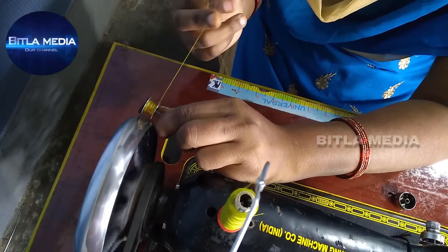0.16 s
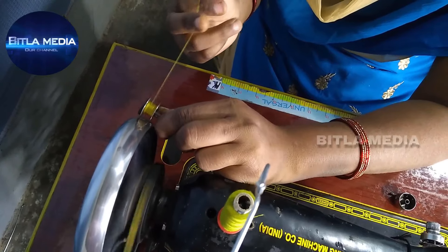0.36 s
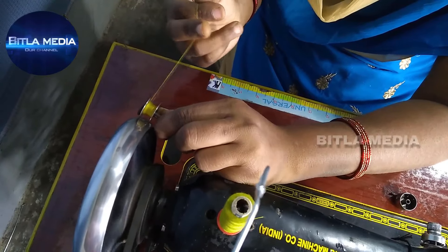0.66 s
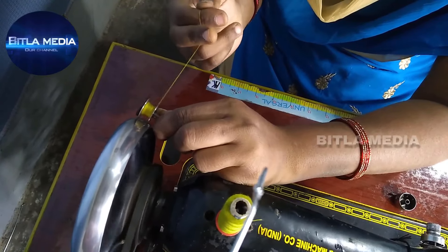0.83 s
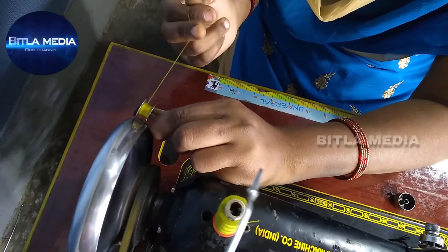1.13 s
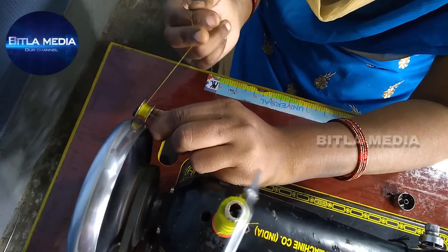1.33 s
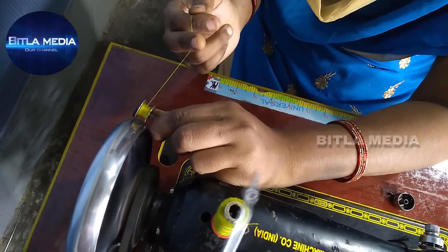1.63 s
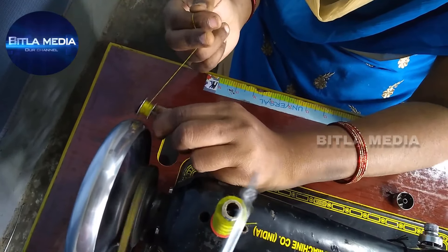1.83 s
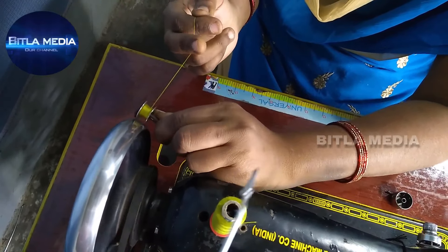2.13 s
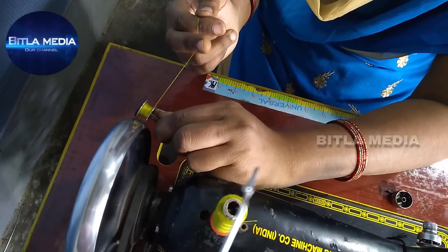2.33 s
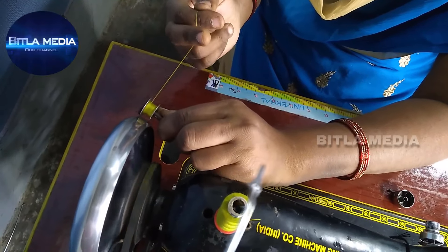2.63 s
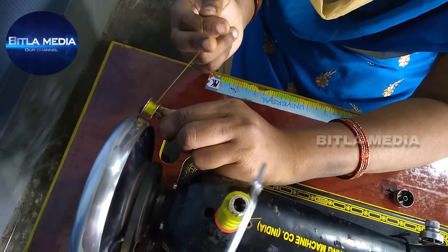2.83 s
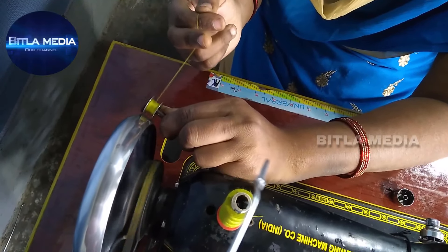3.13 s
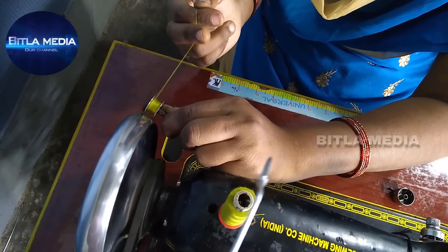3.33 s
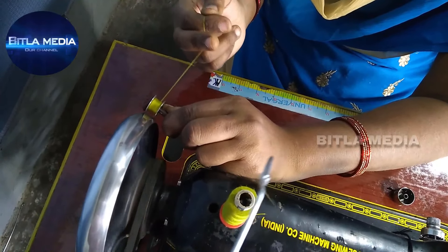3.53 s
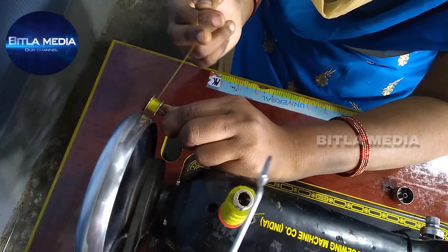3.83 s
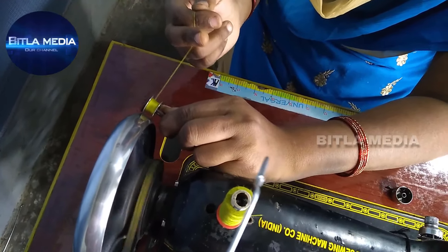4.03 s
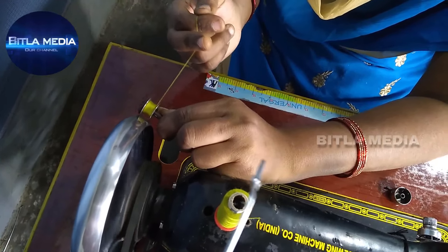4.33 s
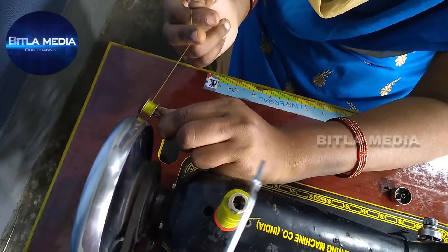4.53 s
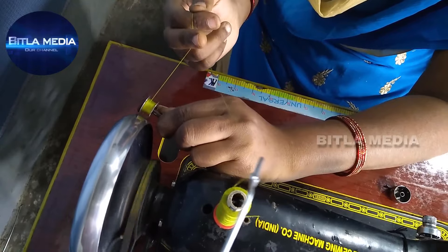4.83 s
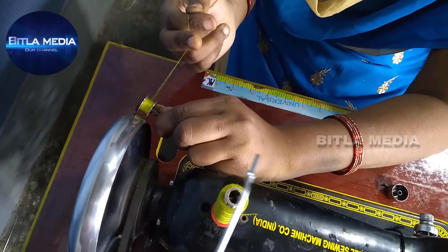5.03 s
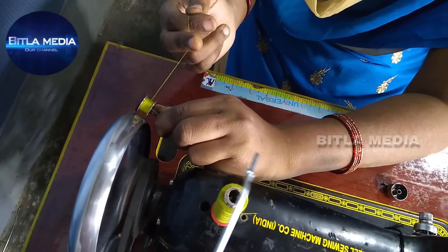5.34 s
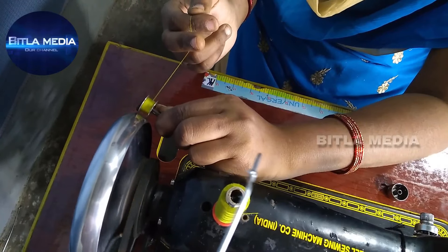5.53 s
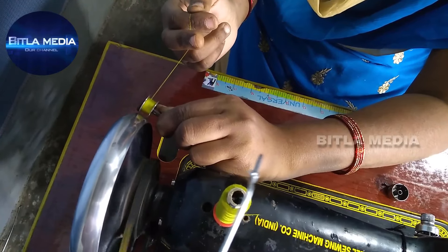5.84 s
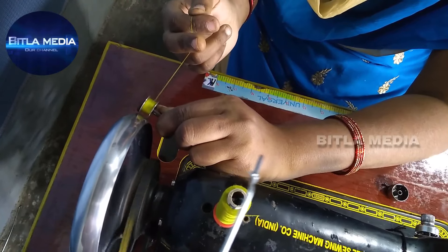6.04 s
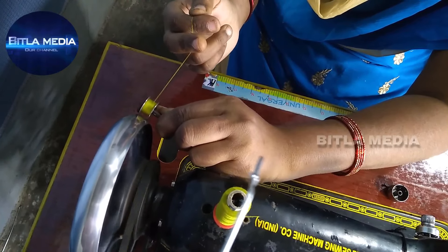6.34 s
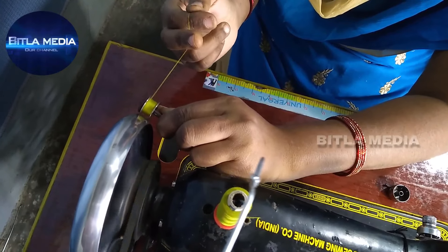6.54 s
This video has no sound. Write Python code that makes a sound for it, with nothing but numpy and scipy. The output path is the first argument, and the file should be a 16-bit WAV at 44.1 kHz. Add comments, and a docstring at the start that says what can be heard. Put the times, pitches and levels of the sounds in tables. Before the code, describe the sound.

A treadle sewing machine winds a bobbin with a bright metallic hiss and high singing, surging and sagging between pushes, with light shuttle clacks beneath.

```python
"""A bright metallic hiss and singing close by on the right: a treadle sewing machine winds a bobbin.
The steel bobbin chafes on its spindle, which feeds its modes. The shuttle clacks twice a stitch as noise bursts,
the iron frame and wooden table rumble as driven resonances, the treadle hums a low gliding note.
The pace sags to near stops between pushes."""
import sys
import numpy as np
from scipy import signal
from scipy.fft import rfft, irfft, next_fast_len
from scipy.io import wavfile
from scipy.ndimage import map_coordinates

SR = 44100
rng = np.random.default_rng(int(sys.argv[2]) if len(sys.argv) > 2 else 0)


def dump(signal):
    """Clip the signal to [-1, 1] and save it as 16-bit WAV at the path in sys.argv[1]."""
    limited = np.clip(np.atleast_2d(signal).T, -1, 1)
    pcm = np.round(limited * 32767).astype(np.int16)
    wavfile.write(sys.argv[1], SR, pcm)


def gain_from_db(level_db):
    """Convert decibel levels to linear amplitude factors (20 dB per decade)."""
    decades = np.asarray(level_db, float) / 20
    return 10 ** decades


N = 294588

# Low modes of the steel bobbin. Each row: frequency in Hz, width in Hz, relative right level in dB,
# left minus right in dB, left-right likeness (0-1).
BOBBIN_LOW_MODES = [(788, 28, -41, 0, .98), (1490, 40, -38, -8, .4), (3585, 36, -21, -16, .8),
                    (3968, 36, -25, -2, .75), (4460, 90, -34, 0, .4), (5250, 55, -14, -5, .6),
                    (5295, 32, -12, -3, .9), (6065, 60, -4, -11, .85), (6120, 45, 0, -10, .9),
                    (6183, 30, -1, -9, .92), (6270, 200, -17, -9, .6)]
# Modes of iron frame and wooden table. Each row: frequency in Hz, width in Hz, relative right level in dB,
# left minus right in dB, left-right likeness (0-1).
FRAME_TABLE_MODES = [(283, 5.3, 2, 3, 0.91), (358, 16.2, 5.5, -0.5, 0.98), (427, 40, -8, -16, 0.28),
                     (523, 34.5, 2.5, -7.5, 0.65), (617, 43, -7, -5, 1), (787, 51, -8.5, 1.5, 0.96),
                     (1466, 65, -15, -34, 0.37), (1642, 93, -8.5, -7, 0.57), (2220, 380, -12.5, -8.5, 0.1),
                     (2930, 150, -10.5, 1.5, 0.58), (3113, 100, -9, -17, 0.17)]
LEFT_LAG_SAMPLES = 9


def rms_one(x):
    """Scales to unit rms."""
    return x / np.sqrt(np.mean(x ** 2) + 1e-20)


def level_one(stereo):
    """Scales so that the mean of both ears has unit rms."""
    return stereo / np.sqrt(np.mean(stereo.mean(axis=0) ** 2))


def drift(rate_hz):
    """Slow random wander of unit rms: noise through a two-pole low-pass near rate_hz."""
    step = 20  # samples
    pole = np.exp(-2 * np.pi * rate_hz * step / SR)
    noise = rng.standard_normal(N // step + 2002)
    slow = signal.lfilter([1], [1, -2 * pole, pole * pole], noise)[2000:]  # settled part
    return np.interp(np.arange(N) / step, np.arange(len(slow)), rms_one(slow))


def grains(spread_db):
    """Two unrelated streams of tiny contacts of uneven size."""
    sizes = gain_from_db(spread_db * np.minimum(rng.exponential(1, (2, N)), 4))
    return rms_one(sizes * rng.standard_normal((2, N)))


def to_ears(pair, likeness, lag_samples):
    """The left microphone hears the source later, mixed with a path of its own."""
    own, source = pair
    alike = np.clip(likeness, 0, 1)
    left = alike * np.roll(source, lag_samples) + np.sqrt(1 - alike ** 2) * own
    return np.array([left, source])


def through_modes(pair, modes, flicker_db=0):
    """A force drives parallel resonances; as the contact wanders each one is fed more or less."""
    airborne_hz = 2000  # lower modes shake the whole table and reach both ears at once
    out = np.zeros((2, N))
    for k, (hz, width_hz, right_db, pan_db, likeness) in enumerate(modes):
        pole, angle = np.exp(-np.pi * width_hz / SR), 2 * np.pi * hz / SR
        zeros = [(1 - pole * pole) / 2, 0, (pole * pole - 1) / 2]
        poles = [1, -2 * pole * np.cos(angle), pole * pole]
        rung = signal.lfilter(zeros, poles, pair + 1e-18)
        ears_db = np.array([[right_db + pan_db], [right_db]])
        gain = gain_from_db(ears_db + flicker_db * drift(9.7))
        lag_samples = LEFT_LAG_SAMPLES * (hz > airborne_hz)
        out += (-1) ** k * gain * to_ears(rung, likeness, lag_samples)
    return out


def coloured(pair, spectrum, likeness, alike_below_hz):
    """Gives each ear its spectrum; long waves reach both ears alike."""
    size = next_fast_len(N)
    hz, right_db, left_db = np.transpose(spectrum)
    bins_hz = np.fft.rfftfreq(size, 1 / SR) + 1
    gain = gain_from_db(np.array([np.interp(np.log(bins_hz), np.log(hz), db) for db in (left_db, right_db)]))
    left, right = rfft(to_ears(pair, likeness, LEFT_LAG_SAMPLES), size)
    share = 1 / (1 + (bins_hz / alike_below_hz) ** 4)
    left = np.sqrt(share) * right + np.sqrt(1 - share) * left
    return level_one(irfft(np.array([left, right]) * gain, size)[:, :N])


def blows(seconds, peaks_db, rise_s, hold_s, t60_s):
    """Envelope of blows: a quick rise, a short hold, then an exponential fall."""
    clicks = np.full(N, 1e-18)
    at = np.minimum(np.round(seconds * SR).astype(int), N - 1)
    clicks[at] = gain_from_db(peaks_db)
    t = np.arange(SR // 5) / SR
    rise = 1 - np.exp(-t / rise_s)
    shape = rise * gain_from_db(-60 * np.maximum(t - hold_s, 0) / t60_s)
    return signal.fftconvolve(clicks, shape / shape.max())[:N]


def in_time(rows):
    """Joins (s, value) rows by straight lines, one value a sample."""
    return np.interp(np.arange(N) / SR, *np.transpose(rows))


def levelling_db(pace, half_pace, power):
    """Gain (negative dB) of a sound that grows as a power of pace and levels off above half_pace."""
    return -20 * np.log10(1 + (half_pace / pace) ** power)


def bobbin(low_db, high_db, hiss_db):
    """One uneven chafing contact makes the hiss and feeds every mode; lone ticks ring the high ones."""
    # High modes of the bobbin. Each row: frequency in Hz, width in Hz, relative right level in dB,
    # left minus right in dB, left-right likeness (0-1).
    high_modes = [(8285, 110, -11, -1, .4), (8378, 40, -7, -6, .4), (8710, 60, -21, 1, .3),
                  (9610, 110, -15, -7, .5), (10530, 55, -3, -13, .7), (10590, 50, -3, -17, .6),
                  (10640, 40, 0, -21, .6), (10682, 28, -3, -19, .6), (11900, 45, -7, -20, .7),
                  (12690, 190, -14, -10, .4), (13270, 120, -24, 1, .3), (14600, 200, -17, -1, .4)]
    # Chafing spectrum. Each row: frequency in Hz, relative right and left density in dB per Hz.
    hiss_spectrum = [(990, -47, -47), (3100, -29, -26.5), (4300, -62.5, -23), (4880, -6, -6),
                     (5560, 5, -17), (7220, -2, -1.5), (8760, 5, -7), (9060, -1, -40), (11400, 6.5, 1.5),
                     (11900, -3.5, -22), (13300, 6.5, 0), (13600, -11, -6), (14500, -31, -28),
                     (15500, -12, -31)]
    # Ticks of the resting bobbin on its spindle. Each row: start in seconds, driving level in dB.
    tick_rows = [(0.3915, -33), (4.6857, -38), (4.7052, -47), (4.793, -35), (4.853, -25), (4.8822, -43),
                 (4.9362, -29)]
    pressure_db = 0.27 * drift(14.0) + 0.84 * drift(61.0)
    contact = grains(spread_db=1.5) * gain_from_db(pressure_db)
    low = gain_from_db(low_db) * level_one(through_modes(contact, BOBBIN_LOW_MODES, flicker_db=3.0))
    high = gain_from_db(high_db) * level_one(through_modes(contact, high_modes, flicker_db=2.5))
    chafing = gain_from_db(hiss_db) * coloured(contact, hiss_spectrum, likeness=0.1, alike_below_hz=210)
    tick_envelope = blows(*np.transpose(tick_rows), rise_s=0.0004, hold_s=0.001, t60_s=0.02)
    ticks = tick_envelope * grains(spread_db=1.0)
    tick_ring = gain_from_db(20) * through_modes(ticks, high_modes)
    tick_edge = gain_from_db(-12) * signal.lfilter([1, -1], [1], ticks)
    return wobbled(low + high, depth_samples=0.72, rate_hz=19.7) + chafing + tick_ring + tick_edge


def wobbled(stereo, depth_samples, rate_hz):
    """The bobbin sits loose: its path to the microphones shakes and every pitch flutters."""
    at = np.arange(N) + depth_samples * drift(rate_hz)
    return np.array([map_coordinates(ear, [at], order=3, mode="nearest") for ear in stereo])


def shuttle(shake_db):
    """Out and back: a thinner second clack a third of a turn after the first, which alone knocks the frame."""
    # Stitches that stand out. Each row: start of first clack in seconds, its driving level in dB.
    stitches = [(0.565, -40), (0.6785, -27.5), (0.765, -28.5), (0.852, -29.5), (0.948, -38), (1.029, -29.5),
                (1.1265, -26.5), (1.207, -27), (1.278, -21), (1.346, -25.5), (1.412, -23.5), (1.477, -24.5),
                (1.546, -25), (1.6143, -25.5), (1.68, -24.5), (1.7435, -25), (1.813, -25), (1.8877, -26.5),
                (1.97, -29), (2.061, -33), (2.1655, -43), (2.289, -34.5), (2.4164, -43), (2.526, -32),
                (2.6385, -34), (3.2494, -45), (3.347, -28), (3.449, -30), (3.84, -34), (3.956, -32),
                (4.0534, -34), (4.133, -28), (4.2215, -31), (5.6094, -33), (5.7124, -27), (5.7944, -23.5),
                (5.8755, -27), (5.967, -30), (6.3914, -34.5), (6.466, -29), (6.557, -26.5), (6.6403, -26.5)]
    # Clack spectrum. Each row: frequency in Hz, relative right and left density in dB per Hz.
    clack_spectrum = [(990, -30.5, -47), (3360, -11.5, -30), (3550, -5.5, -9), (4080, -10.5, -22),
                      (4680, -2, -2), (5940, 1, -5.5), (7940, -2, -4.5), (11400, -2, -22), (14000, -12, -8),
                      (15800, -17, -20)]
    second_turn, longest_stitch_s = 0.34, 0.24
    s, peak_db = np.transpose(stitches)
    chance = rng.standard_normal((len(s), 2))
    shake_at_db = shake_db[(s * SR).astype(int)]
    knock_db = -50.5 + 1.82 * shake_at_db + 0.5 * chance[:, 0]
    second_db = -4.5 + 0.6 * shake_at_db + 1.5 * chance[:, 1]  # against the first clack
    stitch_s = np.minimum(np.diff(s, append=s[-1] + 0.058), longest_stitch_s)
    second_s = s + second_turn * stitch_s

    rattle = coloured(grains(spread_db=3.0), clack_spectrum, likeness=0.043, alike_below_hz=470)
    thin = signal.sosfilt(signal.butter(4, 4300, "high", fs=SR, output="sos"), rattle)
    first = blows(s, peak_db, rise_s=0.00045, hold_s=0.0045, t60_s=0.058) * rattle
    second = blows(second_s, peak_db + second_db, rise_s=0.0004, hold_s=0.006, t60_s=0.06) * thin

    push = blows(s, knock_db, rise_s=0.0021, hold_s=0.0026, t60_s=0.18) * grains(spread_db=4.0)
    push = signal.sosfilt(signal.butter(2, 2100, fs=SR, output="sos"), push)  # heavy frame, blunt blow
    arm = [mode for mode in FRAME_TABLE_MODES if 1000 < mode[0] < 2000]
    table = [mode for mode in FRAME_TABLE_MODES if mode[0] < 1000]
    knock = gain_from_db(36.5) * through_modes(push, arm)
    boom = gain_from_db(19.0) * through_modes(push, table)
    ping = gain_from_db(29) * through_modes(first, BOBBIN_LOW_MODES[2:4])  # first clack rings two steel modes
    return gain_from_db(-1.5) * (first + second) + ping + knock + boom


def frame(ringing_db):
    """Bearings and belt shake the iron and wood; loose parts buzz more steeply with the shaking."""
    # Rumble spectrum. Each row: frequency in Hz, relative right and left density in dB per Hz.
    rumble_spectrum = [(20, -9, -9), (82, -13, -16), (220, -2.5, -3.5), (385, -5.5, -6.5), (720, -22, -10),
                       (1130, -7.5, -8), (2140, -22, -13), (2600, -24, -11), (3200, -7, -37),
                       (4970, -36, -17)]
    shaking = grains(spread_db=4.0) * gain_from_db(2.7 * drift(26.0))
    ringing = gain_from_db(ringing_db) * level_one(through_modes(shaking, FRAME_TABLE_MODES, flicker_db=1.5))
    rumble = coloured(shaking, rumble_spectrum, likeness=0.86, alike_below_hz=740)
    small_parts = [mode for mode in FRAME_TABLE_MODES if mode[0] > 2000]
    buzz_db = -63.5 + 3.14 * (ringing_db + 53)
    buzz = level_one(through_modes(grains(spread_db=7.0), small_parts, flicker_db=4.0))
    return ringing + gain_from_db(ringing_db - 2.5) * rumble + gain_from_db(buzz_db) * buzz


def treadle(pace):
    """Each push sounds a low note that starts sharp and settles, over the looser thrumming of the stand."""
    # Pushes on the treadle. Each row: start in seconds, length in seconds, note level in dB before its swell.
    pushes = [(.005, 0.093, -64), (0.307, 0.43, -62), (0.955, 0.33, -68), (2.315, 0.22, -68),
              (2.962, 0.4, -64.5), (3.73, 0.066, -63), (3.897, 0.27, -73), (4.791, 0.29, -60),
              (5.453, 0.46, -64), (6.184, 0.48, -67)]
    # Modes of the stand. Each row: frequency in Hz, width in Hz, relative right level in dB,
    # left minus right in dB, left-right likeness (0-1).
    stand_modes = [(107, 21, -4.5, 0, 1), (131, 17, 1.5, 0, 0.99), (143.5, 25, -1, 0, 0.96)]
    note_hz, start_sharp, settle_s = 98.4, 0.11, 0.062  # start_sharp: share of note_hz
    t, note = np.arange(N) / SR, np.zeros(N)
    waver = gain_from_db(2.2 * drift(23.0))
    for start_s, length_s, note_db in pushes:
        since = np.maximum(t - start_s, 0)
        turns = note_hz * (since - start_sharp * settle_s * np.exp(-since / settle_s))
        rise = np.clip(since / 0.0081, 0, 1)
        release = np.clip((length_s - since) / 0.044 + 1, 0, 1)
        swell = rise * release * gain_from_db(-5 * since / length_s)
        note += np.sqrt(2) * gain_from_db(note_db) * swell * np.sin(2 * np.pi * turns)
    thrum_db = -67 + 2.5 * drift(6.3) + levelling_db(pace, half_pace=2.7, power=2.5)
    thrum = level_one(through_modes(rng.standard_normal((2, N)), stand_modes))
    return waver * note + gain_from_db(thrum_db) * thrum


def room():
    """Faint steady air noise, plainest when the wheel rests."""
    # Air spectrum. Each row: frequency in Hz, relative right and left density in dB per Hz.
    air_spectrum = [(150, -2, 0), (600, -9, -8), (2000, -4, 1), (5000, -4, -12), (12000, -24, -24)]
    air = rng.standard_normal((2, N))
    return gain_from_db(-83) * coloured(air, air_spectrum, likeness=0.27, alike_below_hz=500)


def scene():
    """Wheel pace sets the levels of bobbin, frame, stand and shuttle knocks; winder grip those of the bobbin."""
    # Pace of the handwheel. Each row: time in seconds, stitches per second.
    pace_rows = [(0, 5.9), (.05, 6), (.16, 4.36), (.26, 2.63), (.3, 1.05), (.33, 2.26), (.385, 3.26),
                 (.4, 4.3), (.48, 5.95), (.62, 8.9), (.8, 11.1), (1.0, 9.2), (1.35, 13.54), (1.8, 12.3),
                 (2.3, 7.08), (2.52, 9.26), (2.95, 4.65), (3.35, 10.2), (3.74, 6.25), (4.14, 12.06),
                 (4.42, 7.36), (4.6, 5.9), (4.71, 3.9), (4.76, 2.5), (4.81, 3.8), (4.84, 3), (4.86, 4.2),
                 (4.98, 5.14), (5.04, 8.85), (5.3, 8.66), (5.46, 6.3), (5.62, 9.9), (5.82, 11.8),
                 (6.2, 7.3), (6.5, 11.65), (6.68, 12.8)]
    # Grip of the winder's tyre on the wheel, slipping once at full pace. Each row: time in seconds, gain in dB.
    grip_rows = [(0, -2), (1.15, 1), (1.4, -5), (1.75, -6), (1.81, -15.5), (1.95, -22.5), (2.12, -5),
                 (2.5, 1.5), (3.6, 0.5), (4.4, 0), (5.3, 0.5), (6.68, 1)]
    usual_pace, half_song_pace = 11.23, 7.09  # stitches per second
    pace = np.maximum(in_time(pace_rows), 0.2)
    grip_db = in_time(grip_rows)
    song_db = levelling_db(pace, half_song_pace, power=3.73)
    shake_db = 2.3 * 20 * np.log10(pace / usual_pace)  # power 2.3 of pace
    low_db = -25.49 + song_db + grip_db
    high_db = -25.5 + 1.09 * song_db + 1.21 * grip_db
    hiss_db = -29.5 + 1.36 * song_db + 0.89 * grip_db  # a slipping tyre still hisses
    song = bobbin(low_db, high_db, hiss_db)
    return song + shuttle(shake_db) + frame(-51.5 + shake_db) + treadle(pace) + room()


def band_limit(x):
    """A steep low-pass at the top of the band."""
    return signal.sosfilt(signal.butter(12, 15790, fs=SR, output="sos"), x)


def record(dry):
    """Two microphones with a steep elliptic top cut."""
    top_cut = signal.ellip(10, 0.5, 60, 15450, fs=SR, output="sos")  # ripple dB, stop dB, edge Hz
    return band_limit(signal.sosfilt(top_cut, dry))


dry = scene()
out = record(dry)
dump(out)
```